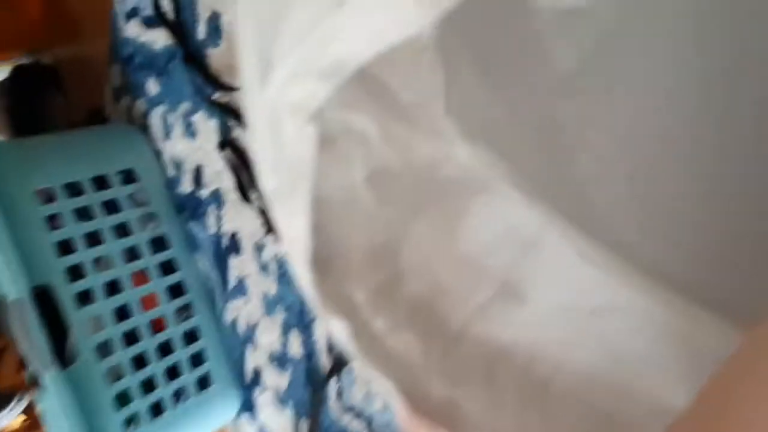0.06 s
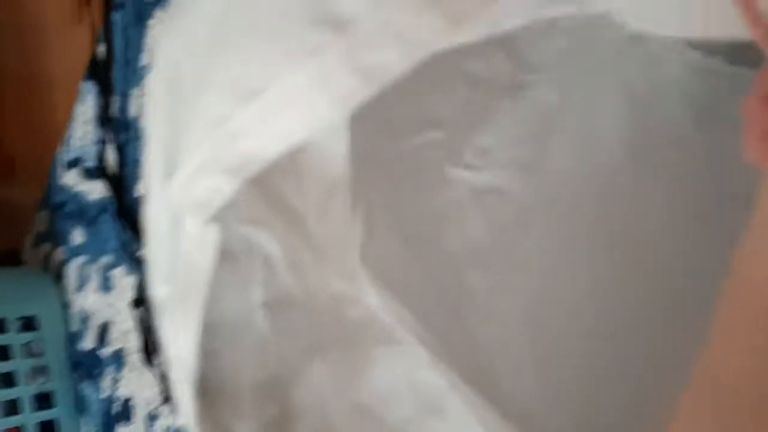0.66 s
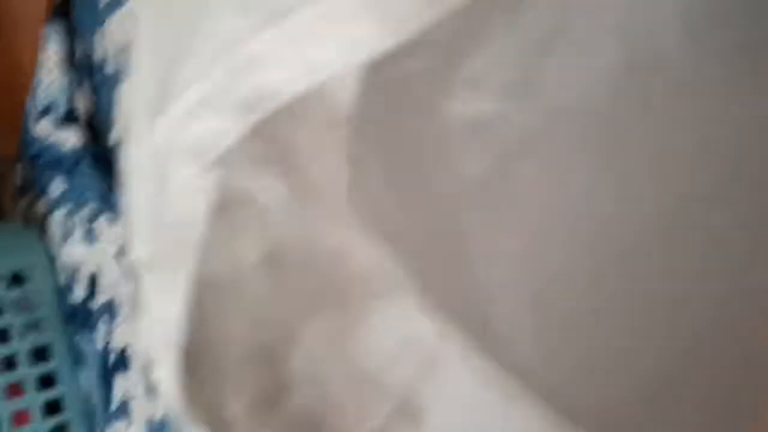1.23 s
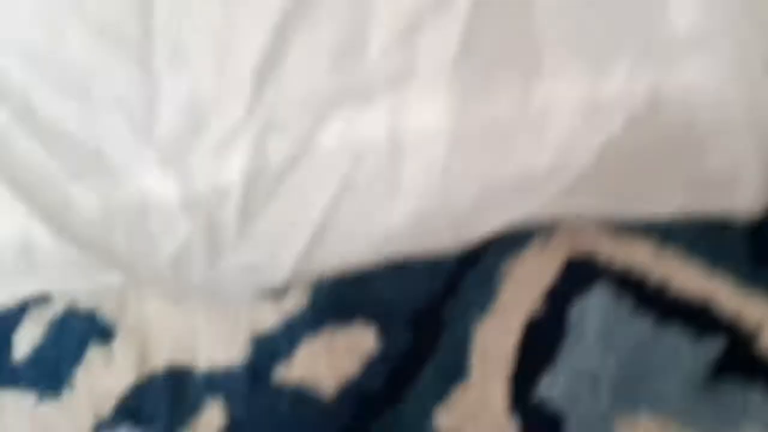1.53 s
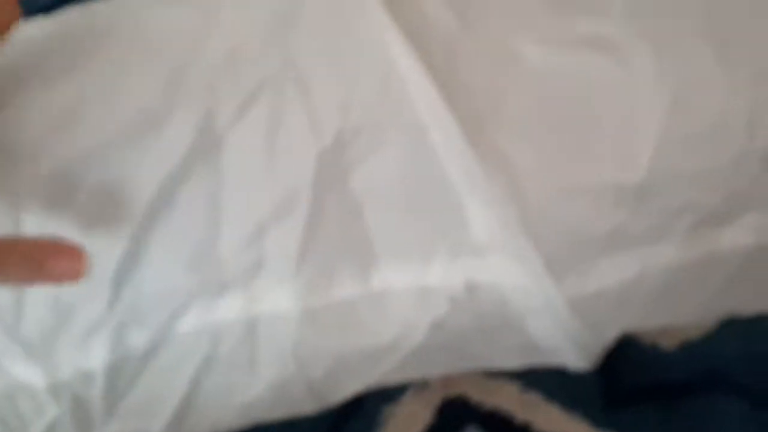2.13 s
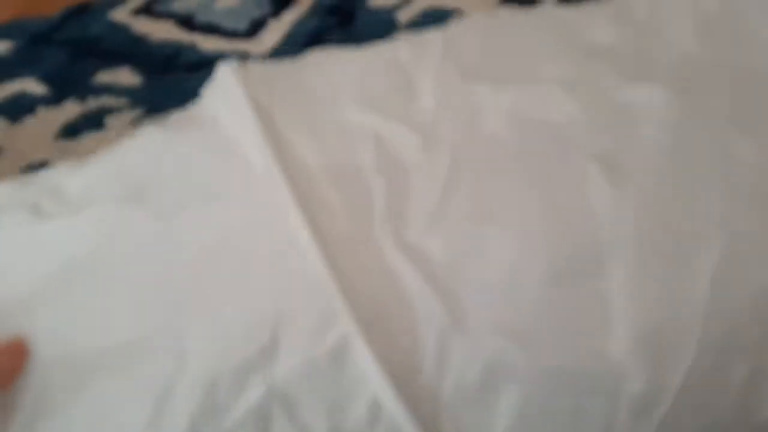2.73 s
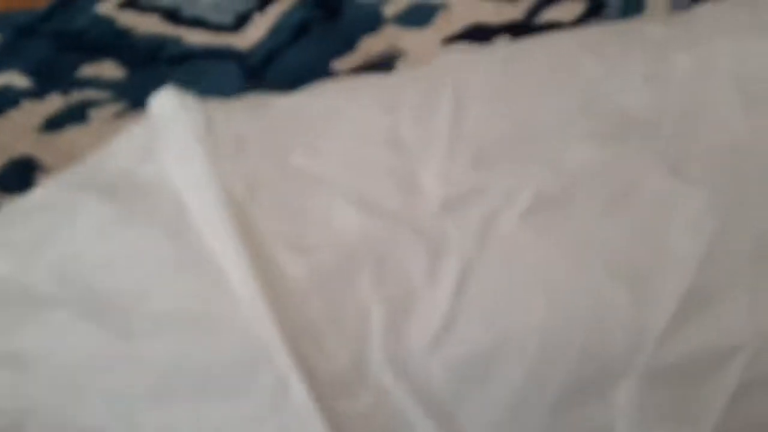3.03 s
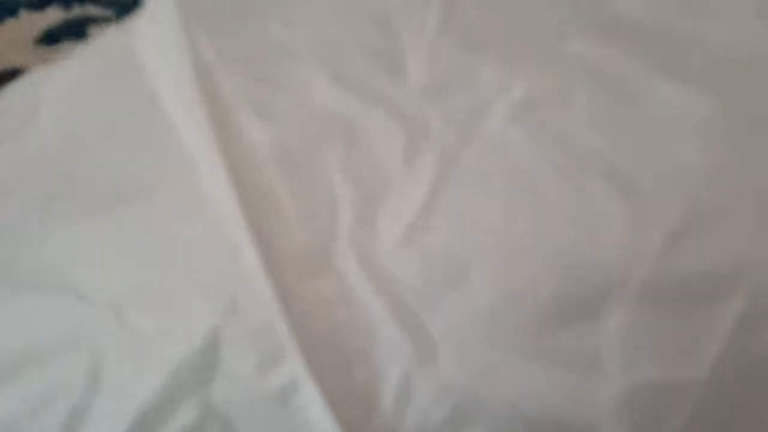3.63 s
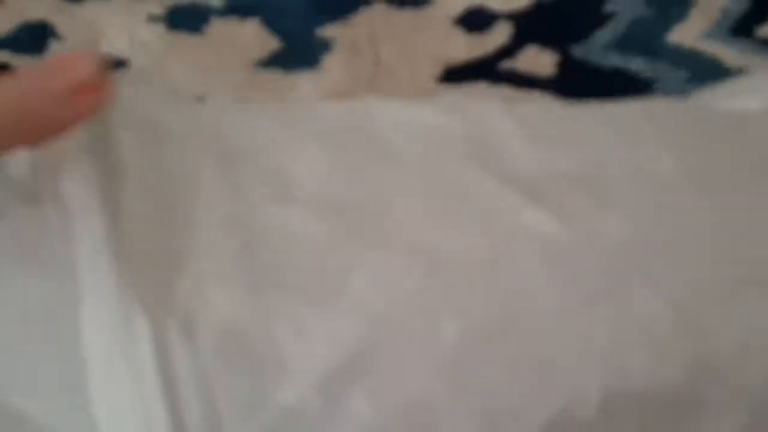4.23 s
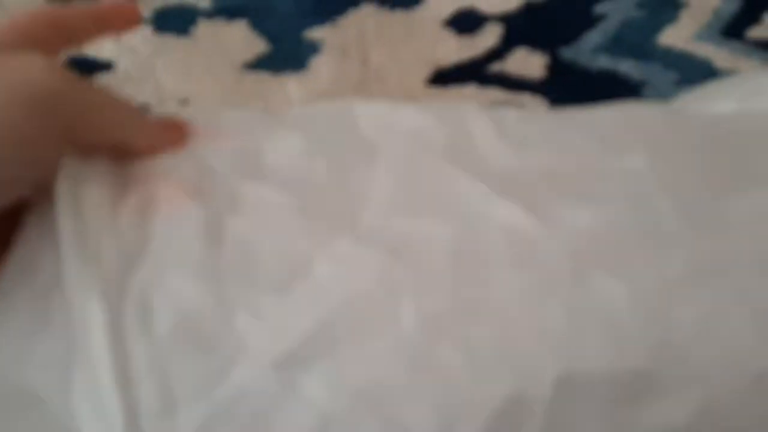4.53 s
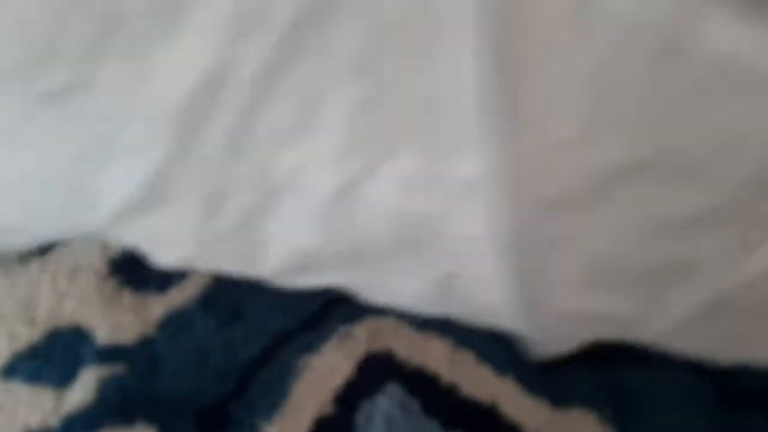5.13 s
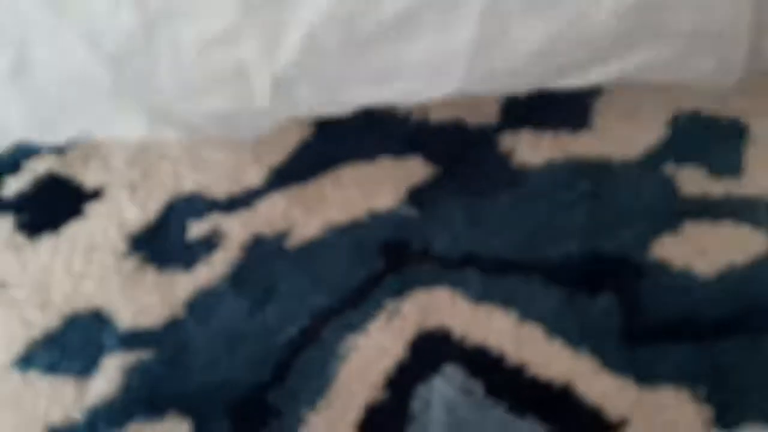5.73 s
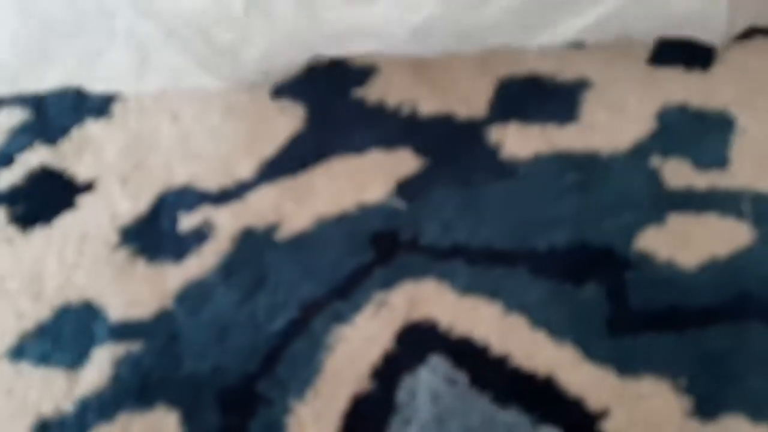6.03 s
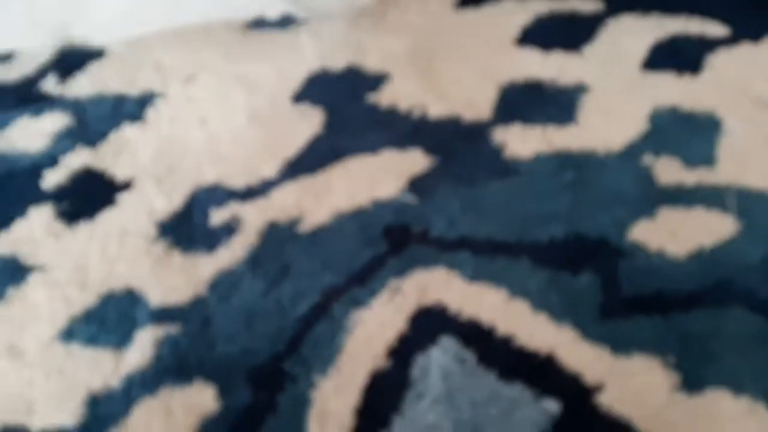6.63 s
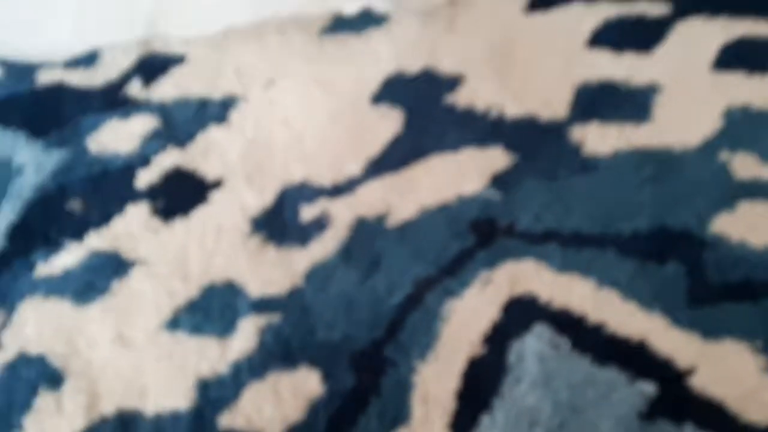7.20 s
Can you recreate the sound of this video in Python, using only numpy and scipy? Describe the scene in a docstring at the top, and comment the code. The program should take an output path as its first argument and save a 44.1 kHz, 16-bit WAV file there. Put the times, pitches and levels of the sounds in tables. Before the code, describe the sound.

Thin, crinkly cloth drags right over the microphone, mostly on the right, with sharp crackles and a few puffs of air. The scraping stops, and a hand pushes and strokes the fold-up fabric tunnel, softly at first, then in louder bursts of swishing, flapping and snapping creases. The rustling dies down, leaving a quiet room with soft moving air and a faint appliance whine.

```python
"""On a rug in a quiet room, a fold-up tunnel of thin, crinkly fabric is handled right at a camera.
At first the cloth scrapes over the right microphone opening (the port), crackling and puffing air in.
Then a hand strokes and pushes the tunnel: the weave swishes, the slack wall flaps, creases snap.
Moving air and the faint whine of an appliance lie behind it all."""
import sys
import numpy as np
from scipy import signal
from scipy.fft import rfft, irfft, next_fast_len
from scipy.io import wavfile
from scipy.ndimage import uniform_filter1d, map_coordinates

SR = 44100
rng = np.random.default_rng(int(sys.argv[2]) if len(sys.argv) > 2 else 0)


def store_wav(level_fs):
    """Save 16-bit WAV to argv[1]."""
    pcm = np.round(np.clip(np.atleast_2d(level_fs), -1, 1) * 32767)
    wavfile.write(sys.argv[1], SR, pcm.T.astype(np.int16))


N = 328986
T = np.arange(N) / SR

# Tone colours (how strong each pitch is) of the flapping wall, crinkling wrinkles and hissing weave,
# as heard through the right microphone opening: f/Hz, level/dB
FLAP_AT_PORT = [(25, -13), (90, -3), (170, -3.5), (300, 1), (520, -9.5), (850, -7), (1250, -13),
                (3000, -52)]
CRINKLE_AT_PORT = [(400, -6.5), (900, 2), (1280, -5), (1540, 5.5), (1780, -0.5), (2040, 5.5), (2250, 2.5),
                   (2600, 4.5), (3900, -5), (6300, 1.5), (8700, -29), (12000, -12.5)]
HISS_AT_PORT = [(1500, -16.5), (4300, -5.5), (6200, 2.5), (7400, -6.5), (8700, -21), (11800, -2),
                (16000, -10.5)]
# how fast each kind of touch swells and fades: rise, fall
PUSH_DB_PER_S, SLIDE_DB_PER_S, SCRAPE_DB_PER_S = (431, 254), (363, 276), (295, 437)


def tunnel():
    """Under the hand the slack wall flaps, small wrinkles crinkle and the weave hisses."""
    push, crumple, slide = hand_strokes()
    flap = wall_flap(push)
    crinkle = coloured(slips(per_s=120, spread_db=2.8, smooth=0.6, life_s=0.0025), CRINKLE_AT_PORT)
    cloth = pockets(flap + crumple * amp(5.5) * crinkle)
    hiss = coloured(slips(per_s=490, spread_db=14, smooth=2.5, life_s=0.0015), HISS_AT_PORT)
    cloth += slide * amp(4) * hiss
    return at_ports(cloth + crease_snaps() + nail_zips() + billows())


def hand_strokes(stir_db=-13, settle_db=-83):
    """How strongly the cloth is pushed, crumpled and rubbed from moment to moment."""
    # the hand pushes the wall in: start/s, hold/s, flap level/dB, crinkle against the flap/dB
    pushes = [(1.528, 0.014, -54.5, -21), (2.095, 0.036, -62.5, -6), (2.3, 0.071, -56, -3.5),
              (2.517, 0.056, -59, -3), (3.036, 0.076, -57.5, -7), (3.493, 0.019, -45, -10.5),
              (3.611, 0.015, -45, 2.5), (3.724, 0.28, -63.5, 3), (4.025, 0.12, -51, -1.5),
              (4.475, 0.1, -55.5, -3), (4.596, 0.032, -43, -2), (4.669, 0.017, -37.5, -10.5),
              (4.758, 0.073, -50.5, -0.5), (4.873, 0.032, -44.5, -5), (4.994, 0.06, -53, -9),
              (5.091, 0.54, -54, -2), (5.257, 0.11, -48.5, -9.5), (5.732, 0.081, -48, -1),
              (5.886, 0.028, -50, -4), (5.999, 0.042, -56.5, -8), (6.6, 0.034, -68, -12.5),
              (7.092, 0.035, -63, -10)]
    # the hand slides over the weave: start/s, hold/s, level/dB
    slides = [(1.76, 0.12, -59.5), (2.3, 0.41, -69), (3.05, 0.027, -60), (3.472, 0.14, -45),
              (3.57, 0.06, -40), (3.735, 0.17, -48.5), (4.065, 0.069, -47.5), (4.565, 0.021, -46),
              (4.76, 0.71, -49), (5.522, .04, -41.5), (5.6, 0.13, -48.5), (5.78, 0.16, -52.5),
              (6.09, 0.016, -53.5)]
    push = touches([(s, hold, db) for s, hold, db, _ in pushes], *PUSH_DB_PER_S)
    crumple = touches([(s, hold, db + extra) for s, hold, db, extra in pushes], *PUSH_DB_PER_S)
    slide = touches(slides, *SLIDE_DB_PER_S) * amp(1.8 * wobble(22))  # the hand's speed is uneven
    # sliding stirs the wrinkles too, and they keep settling between touches
    crumple = np.sqrt(crumple ** 2 + (amp(stir_db) * slide) ** 2 + amp(settle_db) ** 2)
    return push, crumple, slide


def wall_flap(push):
    """The slack wall gives way with a low, fluttering rustle."""
    flutter = amp(1.5 + 1.1 * wobble(35))
    rustle = slips(per_s=120, spread_db=-2.5, smooth=0.81, life_s=0.0044)
    return push * flutter * coloured(rustle, FLAP_AT_PORT)


def crease_snaps(tick_db=-7, shake_db=-7.5):
    """A crease pops through, which also ticks in the weave and shakes the wall."""
    # snapping creases: t/s, level/dB, f/Hz
    creases = [(2.2948, -42, 3200), (2.765, -43.5, 1380), (3.4909, -34.5, 2920), (3.625, -26, 2180),
               (3.7373, -34, 2280), (3.936, -39.5, 1850), (4.009, -29.5, 2120), (4.072, -35.5, 800),
               (4.468, -47.5, 1010), (4.5842, -29, 2750), (4.6252, -28, 2920), (4.6755, -47, 780),
               (4.7546, -34, 2850), (4.8792, -36, 3200), (4.9008, -32, 900), (5.092, -40.5, 995),
               (5.209, -35.5, 2100), (5.395, -39.5, 2820), (5.427, -39.5, 2030), (5.906, -38.5, 1800)]
    out = np.zeros((2, N))
    for s, db, hz in creases:
        colour = wrinkle(CRINKLE_AT_PORT, hz, peak_db=6, octaves=0.16)
        pop = snap(colour, life_s=0.0034, spike=0.13, build_s=0.00039)
        tick = snap(HISS_AT_PORT, life_s=0.0013, spike=0.94, build_s=0.00044)
        shake = snap(FLAP_AT_PORT, life_s=0.013, spike=0.46, build_s=0.00051)
        add(out, s, amp(db) * (pop + amp(tick_db) * tick + amp(shake_db) * shake))
    return out


def nail_zips(length_s=0.07, start_hz=13200, end_hz=16000):
    """Faint whistles whose pitch is the rate of threads passing under a fingernail."""
    # zips over the fine weave: t/s, level/dB
    zips = [(3.385, -50), (7.385, -53)]
    out = np.zeros((2, N))
    glide_hz = np.linspace(start_hz, end_hz, int(length_s * SR))
    for s, db in zips:
        hz = glide_hz + 150 * wobble(1060)[:len(glide_hz)]
        whistle = np.hanning(len(hz)) * np.sin(2 * np.pi * np.cumsum(hz) / SR)
        add(out[0], s, amp(db) * whistle)
    return out


def billows(top_hz=150, hold_s=0.038):
    """The tunnel billows and pushes soft, deep gusts of air out of its mouth."""
    # gusts: t/s, level/dB
    gusts = [(2.78, -59.5), (4.45, -54.5), (4.895, -52), (5.27, -48)]
    air = unit(filtered(rng.standard_normal((2, N)), lambda hz: 1 / (1 + (hz / top_hz) ** 4)))
    return air * touches([(s, hold_s, db) for s, db in gusts], *PUSH_DB_PER_S)


def port_scrape():
    """Cloth drags over the right port; a little sound leaks through the case to the left one."""
    # air pressed into the right port: t/s, level/dB, f/Hz, time to fade by 60 dB/s
    puffs = [(.008, -10.5, 66, 0.064), (.227, -35, 75, 0.32), (.2295, -12, 338, 0.018),
             (1.208, -9.5, 66, 0.035), (1.396, -30, 130, 0.035)]
    # the grip shifting on the left of the case: same columns
    grip = [(1.322, -37.5, 217, 0.13)]
    drag = cloth_drag() + wrinkle_catches()
    leak = coloured(drag[1], [(240, 1.5), (1100, -2.5), (1520, -2), (2500, -2), (14000, 2)])
    left = amp(-15.5) * leak + thumps(grip)
    right = drag[0] + groan() + thumps(puffs)
    return np.array([left, right])


def cloth_drag():
    """Fibres rub on the port: a low rasp, a bright sizzle and ticks as single threads let go."""
    # separate scrapes: start/s, hold/s, rasp level/dB, sizzle against the rasp/dB
    scrapes = [(0.0, 0.034, -41.5, 3), (0.06, 0.13, -57, 6), (0.199, 0.046, -38.5, 2),
               (0.269, 0.077, -40.5, -7), (0.382, 0.025, -45, 5.5), (0.432, 0.046, -50, -3.5),
               (0.531, 0.021, -46, 2.5), (0.628, 0.17, -55, 1.5), (0.94, 0.17, -57.5, 1),
               (1.207, 0.044, -44, 3.5), (1.329, 0.067, -47, -1), (1.465, 0.046, -50.5, -0.5)]
    # the cloth still creeps between scrapes: start/s, hold/s, level/dB
    creep = (0.0, 1.6, -76)
    # tone colours of the rubbing, heard through the port: f/Hz, level/dB
    rasp_colour = [(25, -14), (80, 4.5), (450, -4), (1250, -4.5), (1540, 0.5), (1760, -8.5), (2050, 1),
                   (2400, -4), (3200, -5.5), (16000, -26.5)]
    sizzle_colour = [(800, -53.5), (2800, -2), (5000, -2.5), (7800, -3), (8800, -10.5), (11500, -2),
                     (16000, -5.5)]
    rasp = touches([creep] + [(s, hold, db) for s, hold, db, _ in scrapes], *SCRAPE_DB_PER_S)
    rasp *= pockets(coloured(slips(per_s=240, spread_db=3.5, smooth=0.9, life_s=0.0013), rasp_colour))
    sizzle = touches([creep] + [(s, hold, db + up) for s, hold, db, up in scrapes], *SCRAPE_DB_PER_S)
    sizzle *= amp(wobble(34.35))  # the treble flickers
    sizzle *= coloured(slips(per_s=530, spread_db=3.5, smooth=0.73, life_s=0.0019), sizzle_colour)
    ticks = touches([creep], *SCRAPE_DB_PER_S)
    ticks *= coloured(slips(per_s=45, spread_db=4, smooth=0, life_s=0.0003), sizzle_colour)
    return amp(6) * (rasp + sizzle) + amp(14.5) * ticks


def wrinkle_catches():
    """Stiff wrinkles catch on the port with sharp cracks."""
    # catches: t/s, level/dB, f/Hz
    catches = [(.0082, -19.5, 1140), (.0324, -32, 6000), (.1808, -30.5, 1720), (0.1856, -23.5, 12500),
               (.1898, -22.5, 10400), (0.1963, -30, 12000), (0.2183, -19.5, 1740), (0.2271, -16, 950),
               (.2439, -26, 5300), (0.2625, -24, 2900), (0.2657, -23, 810), (0.3257, -26.5, 2120),
               (0.4609, -35, 1910), (0.9095, -45, 6100), (0.9828, -26, 11700), (1.153, -33, 10100),
               (1.1759, -30, 1900), (1.1861, -27, 2700), (1.1961, -19.5, 2240), (1.2065, -17.5, 1820),
               (1.2145, -23, 6100), (1.2327, -27.5, 6600), (1.2504, -28.5, 4550), (1.2587, -33.5, 1300),
               (1.2927, -25.5, 5200), (1.335, -34.5, 4700), (1.3956, -24, 2450)]
    # tone colour of a crack, heard through the port: f/Hz, level/dB
    crack_colour = [(200, 5), (1500, -4), (5500, -3), (8700, -8), (11500, -0.5), (16000, -7.5)]
    out = np.zeros((2, N))
    for s, db, hz in catches:
        colour = wrinkle(crack_colour, hz, peak_db=13, octaves=1)
        add(out, s, amp(db) * snap(colour, life_s=0.0011, spike=0.65, build_s=0.00044))
    return out


def groan():
    """Tight patches of cloth ring briefly as they drag."""
    # patches: middle/s, length/s, level/dB, f/Hz, width/Hz
    patches = [(0.521, 0.13, -36, 5100, 2600), (0.742, 0.13, -48.5, 790, 258)]
    out = np.zeros(N)
    for s, length, db, hz, width_hz in patches:
        tone = filtered(rng.standard_normal(N), lambda f: 1 / (1 + (2 * (f - hz) / width_hz) ** 2))
        swell = np.cos(np.pi * np.clip((T - s) / length, -0.5, 0.5)) ** 2
        out += amp(db) * unit(tone) * swell
    return out


def thumps(rows):
    """Swings of air pressure that start suddenly and die away."""
    out = np.zeros(N)
    for s, db, hz, fade_s in rows:
        t = np.maximum(T - s, 0)
        out += amp(db - 60 * t / fade_s) * np.sin(2 * np.pi * hz * t)
    return out


def echo(x, fade_s=0.32):
    """The short echo of the hollow tunnel and the soft room, one tail for each port."""
    t = np.arange(SR // 3) / SR
    tail = rng.standard_normal((2, len(t))) * amp(-60 * t / fade_s)
    return signal.fftconvolve(x, tail / np.linalg.norm(tail[0]), axes=1)[:, :N]


def room_tone():
    """Moving air and the slightly unsteady whine of an appliance."""
    # tone colour of the air, heard through the port: f/Hz, level/dB
    air_colour = [(25, -30.5), (86, 4), (150, -8), (250, -3.5), (430, -15.5), (750, -16), (1150, -27),
                  (1600, -13.5), (1950, -28), (2700, -12.5), (3300, -31.5), (5200, -18), (6600, -23.5),
                  (8400, -50.5), (13000, -26.5)]
    # the appliance's tones: f/Hz, level/dB
    tones = [(2446, -74), (2594, -86), (2794, -65.5), (5152, -86), (5523, -83)]
    # the whine swells as the tunnel moves aside: t/s, gain/dB
    whine_gain = [(6.0, -8.5), (6.8, 0.5), (7.15, -6)]
    air = amp(-59.5) * coloured(rng.standard_normal((2, N)), air_colour)
    swell = amp(np.interp(T, *np.transpose(whine_gain)) + wobble(2.9))
    waver = wobble(5)
    air[0] += swell * sum(amp(db) * np.sin(2 * np.pi * hz * T + waver) for hz, db in tones)
    return at_ports(air)


def at_ports(pair, lead_s=0.000312, alike_hz=650):
    """Two signals become left and right: alike in the bass, earlier and mostly duller on the left."""
    # the left port against the right one: f/Hz, gain/dB
    left_colour = [(300, -2.5), (700, -2), (1500, -5), (2100, -8.5), (4300, -3.5), (6200, -14.5),
                   (8700, 2.5), (12000, -8)]

    def shares(hz):
        """How much of each pitch the ports have in common (mid) and how much not (side)."""
        likeness = 0.11 + 0.875 / (1 + (hz / alike_hz) ** 4)
        return np.sqrt([(1 + likeness) / 2, (1 - likeness) / 2])

    mid, side = filtered(pair, shares)
    left = filtered(mid + side, lambda hz: amp(along(left_colour, hz)) * np.exp(2j * np.pi * hz * lead_s))
    return np.array([left, mid - side])


def touches(rows, rise, fall):
    """Joint strength of (start/s, hold/s, level/dB) touches that rise, hold and fall, in two channels."""
    t = T[::32]
    start, hold, db = np.transpose(rows)[..., None]
    each = amp(db - rise * np.maximum(start - t, 0) - fall * np.maximum(t - start - hold, 0))
    strength = np.interp(T, t, np.linalg.norm(each, axis=0))
    return np.array([strength, strength])


def slips(per_s, spread_db, smooth, life_s):
    """Tiny fibre slips of random size, each a burst of noise, over smooth rubbing."""
    sizes = amp(spread_db * np.minimum(rng.exponential(size=N), np.pi))
    sizes *= rng.random(N) < per_s / SR
    power = signal.lfilter([1], [1, -np.exp(-2 / (life_s * SR))], sizes ** 2)
    return unit(np.sqrt(power / power.mean() + smooth ** 2) * rng.standard_normal((2, N)))


def snap(colour, life_s, spike, build_s, size=4096):
    """The cloth buckles once: slips build up to a spike, then a shiver dies away."""
    t = (np.arange(size) - size // 2) / SR
    shiver = rng.standard_normal((2, size)) * np.exp(-np.abs(t) / np.where(t < 0, build_s, life_s))
    shiver /= np.linalg.norm(shiver[0])
    shiver[0, size // 2] += spike
    sound = coloured(shiver, colour)
    return sound * np.sqrt(0.004 * SR) / np.linalg.norm(sound[0])  # the energy of 4 ms at level 1


def wrinkle(colour, pitch_hz, peak_db, octaves):
    """One wrinkle adds a hump to the given tone colour, at a pitch that its size sets."""
    hz = np.geomspace(20, SR / 2, 256)
    hump_db = peak_db * np.exp(-(np.log2(hz / pitch_hz) / octaves) ** 2)
    return np.transpose([hz, along(colour, hz) + hump_db])


def pockets(x, depth_db=3):
    """Pockets in the folds open and close, so broad bands of pitch swell and fade."""
    spectra = signal.stft(x, nperseg=512)[2]
    drift = uniform_filter1d(rng.standard_normal(spectra.shape[1:]), size=5, axis=0)  # smooth over pitch
    drift = uniform_filter1d(drift, size=7, axis=1)  # and over time
    return signal.istft(spectra * amp(depth_db * unit(drift)), nperseg=512)[1][:, :N]


def coloured(x, points, size=4096):
    """Give x a tone colour of (f/Hz, level/dB) points; white noise keeps its power."""
    cepstrum = irfft(np.log(amp(along(points, np.fft.rfftfreq(size, 1 / SR)))))
    cepstrum[1:size // 2] *= 2  # folded so that the filter rings only after a sound, never before
    cepstrum[size // 2 + 1:] = 0
    ring = irfft(np.exp(rfft(cepstrum)))
    ring /= np.linalg.norm(ring)
    return np.apply_along_axis(lambda row: signal.fftconvolve(row, ring)[:len(row)], -1, x)


def filtered(x, response):
    """Multiply each frequency in x by response(hz)."""
    size = next_fast_len(N + SR // 4)
    return irfft(rfft(x, size) * response(np.fft.rfftfreq(size, 1 / SR)), size)[..., :N]


def add(track, s, sound):
    """Mix a sound into a track with its middle at s seconds."""
    start = round(s * SR) - sound.shape[-1] // 2
    sound = sound[..., max(-start, 0):]
    part = track[..., max(start, 0):][..., :sound.shape[-1]]
    part += sound[..., :part.shape[-1]]


def wobble(per_s):
    """A smooth curve through per_s random values a second."""
    return map_coordinates(rng.standard_normal(int(N * per_s / SR) + 4), [T * per_s])


def along(points, hz):
    """Read between (f/Hz, value) points, with octaves evenly spaced."""
    point_hz, values = np.transpose(points)
    return np.interp(np.log(hz + 1), np.log(point_hz), values)


def amp(db):
    """Turn decibels into a gain."""
    return 10 ** (np.asarray(db) / 20)


def unit(x):
    """Scale to an average (rms) level of 1."""
    return x / np.sqrt(np.mean(x ** 2) + 1e-20)


def scene():
    """The tunnel in its room, and the scraping on the port itself."""
    cloth = tunnel()
    return cloth + amp(-9) * echo(cloth) + port_scrape() + room_tone()


def record(dry, low_cut_hz=32, top_hz=16000):
    """The sound drops out briefly as the scraping ends; the microphone loses the lowest bass and the top."""
    dropout = np.interp(T, [1.506, 1.514, 1.536, 1.542], [1, 0.02, 0.02, 1])
    return filtered(dry * dropout, lambda hz: (hz < top_hz) * (1j * hz / (low_cut_hz + 1j * hz)) ** 2)


dry = scene()
out = record(dry)
store_wav(out)
```